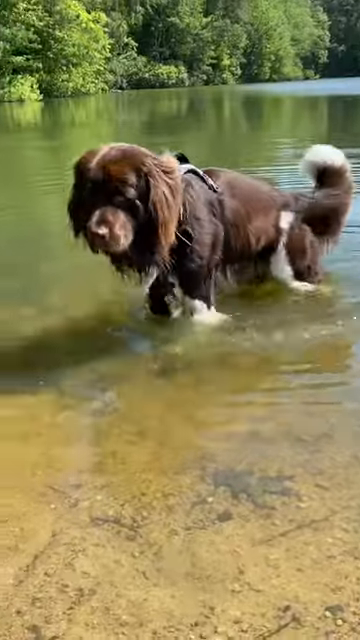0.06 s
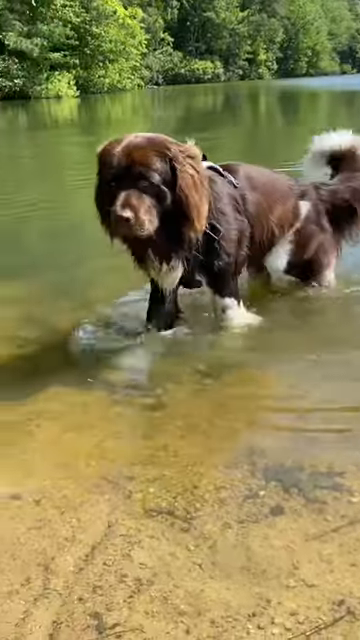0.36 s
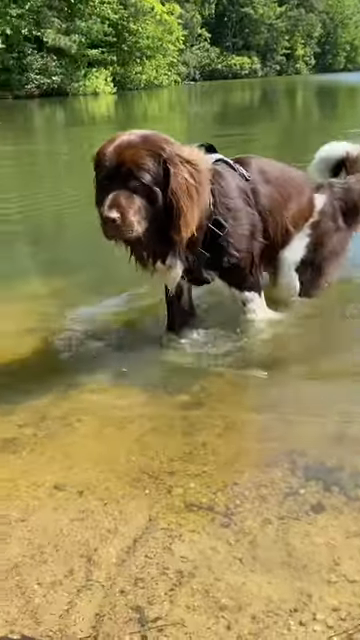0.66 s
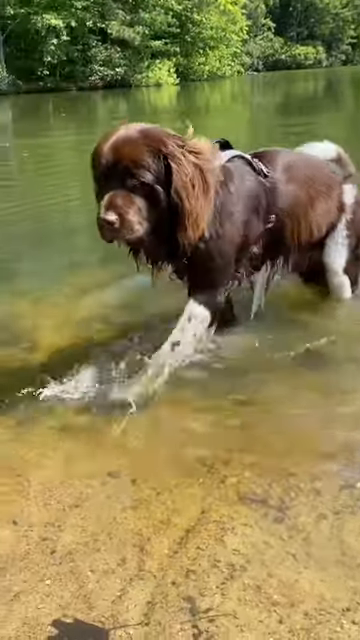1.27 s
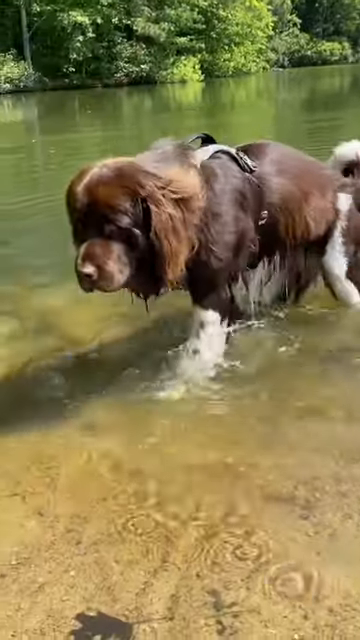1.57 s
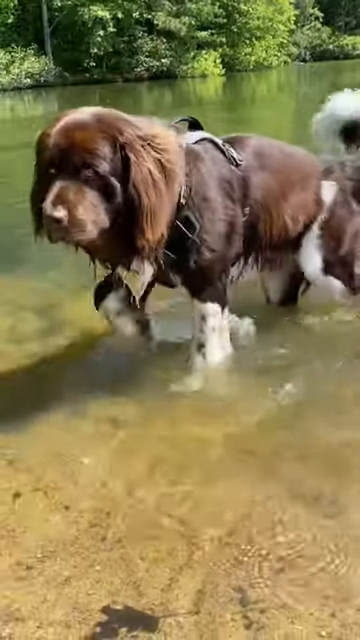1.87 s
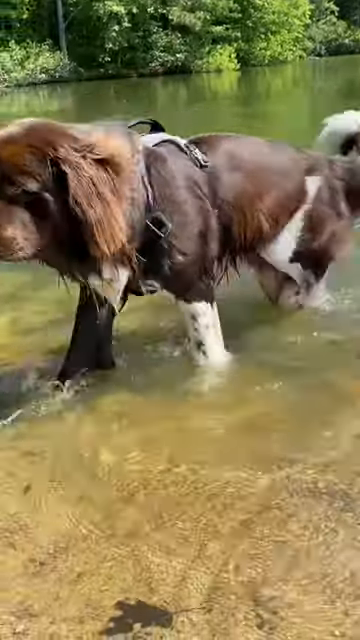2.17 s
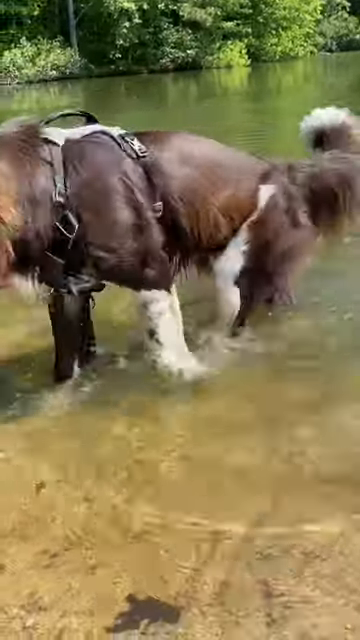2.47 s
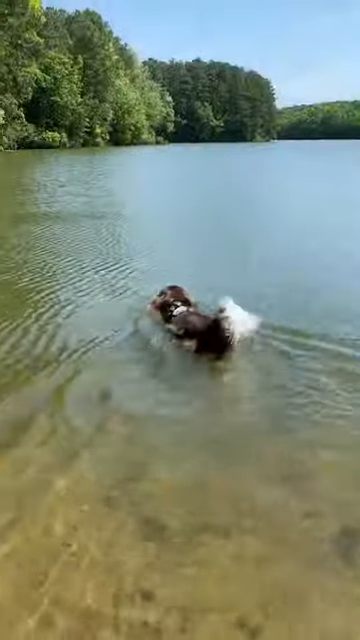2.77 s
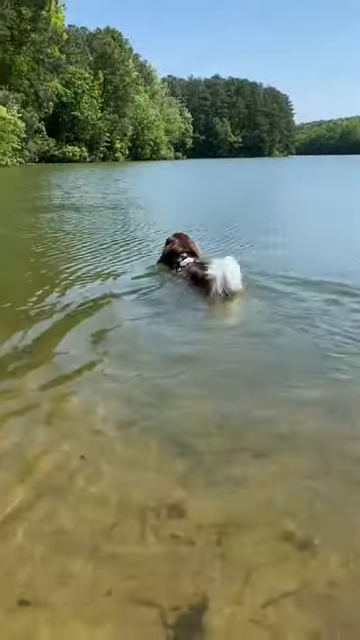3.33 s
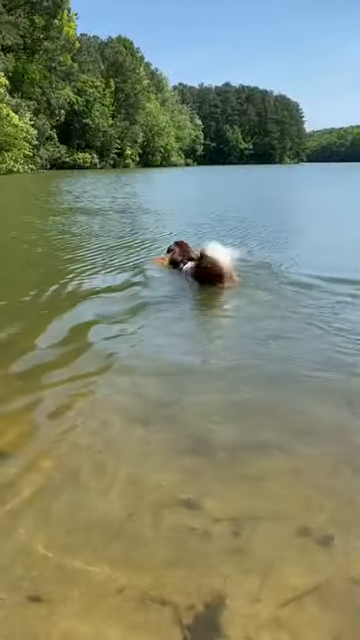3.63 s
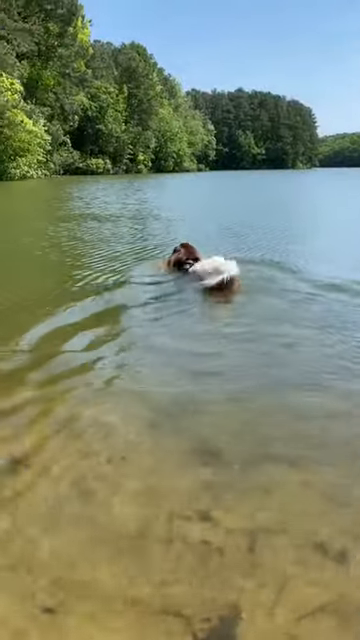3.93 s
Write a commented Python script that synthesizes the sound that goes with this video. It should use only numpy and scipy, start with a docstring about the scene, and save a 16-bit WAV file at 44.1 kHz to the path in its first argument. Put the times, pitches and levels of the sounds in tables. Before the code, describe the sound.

Close splashing and dripping come from a big dog wading at a lake's edge. The water then turns much quieter as it swims farther out, with small metallic clinks, a distant hum and soft wind bumps on the microphone.

```python
"""Lake shallows, on a microphone with two closely spaced ports. A large dog wades close by: each stride
churns up bubbles, which ring as dying sines, and throws spray, and its coat drips. From about 2.6 s
it is swimming far out: only light splashes, the clink of a metal clip and a low distant drone remain.
A faint wind rumbles throughout and buffets the ports, mostly near the end."""
import sys
import numpy as np
from scipy import signal
from scipy.fft import rfft, irfft
from scipy.io import wavfile

SR = 44100
rng = np.random.default_rng(int(sys.argv[2]) if len(sys.argv) > 2 else 0)


def persist_wave(psi):
    """Save psi, clipped to +-1, as 16-bit WAV."""
    counts = np.round(np.clip(psi, -1, 1) * 32767).astype(np.int16)
    wavfile.write(sys.argv[1], SR, np.atleast_2d(counts).T)


N = 176400
TIME, FREQS = np.arange(N) / SR, np.fft.rfftfreq(N, 1 / SR)
BAND_LIMIT_HZ = 15800


def amp(db):
    """Decibels to gain."""
    return 10 ** (np.asarray(db) / 20)


def unit(x):
    """Scales to rms 1."""
    return x / np.sqrt(np.mean(x ** 2) + 1e-20)


def across(points):
    """Reads a table over frequency on a log axis."""
    hz, value = np.transpose(points)
    return np.interp(np.log(FREQS + 1), np.log(hz + 1), value)


def level(points):
    """Gain over time from a table in dB; silent outside it."""
    times, db = np.transpose(points)
    return amp(np.interp(TIME, times, db)) * (TIME >= times[0]) * (TIME <= times[-1])


def colour(x, spectrum):
    """Gives a flat sound a spectrum, at rms 1."""
    return unit(irfft(rfft(x) * amp(across(spectrum)), N))


def drift(rate_hz):
    """Slow random wandering, rms 1."""
    return unit(irfft(rfft(rng.standard_normal(N)) * np.exp(-(FREQS / rate_hz) ** 2), N))


def add(mix, start, sound):
    """Mixes a sound in at a time in seconds."""
    part = mix[max(round(start * SR), 0):][:len(sound)]
    part += sound[:len(part)]


# Hiss from ahead, alike at both ports: f/Hz, spectral level/dB
HISS_SPECTRUM = [(300, 8.5), (1000, -7.5), (2200, -5), (4000, -8.5), (6300, -2.5), (9000, -6.5),
                 (12000, -5), (15500, -18)]
# Far water, different at each port: f/Hz, spectral level/dB
WASH_SPECTRUM = [(70, -24), (180, -4), (500, -2), (1000, 1), (2000, -14), (4000, -14), (7000, -58)]
def open_lake(hiss_db=-57, wash_db=-55.5, flicker_db=3):
    """Hiss and far water wash in from the open lake, flickering in level."""
    hiss = amp(hiss_db) * colour(rng.standard_normal(N), HISS_SPECTRUM)
    wash = amp(wash_db) * colour(rng.standard_normal((2, N)), WASH_SPECTRUM)
    return (hiss + wash) * amp(flicker_db * drift(32))


# Drone in the distance: t/s, level/dB
DRONE_LEVEL = [(2.56, -67), (2.59, -34.5), (2.71, -37.5), (2.76, -43), (3.03, -43), (3.25, -54),
               (3.56, -41), (3.8, -44), (4, -57)]
def distant_drone(hz=108.4, waver=0.024):
    """One low tone, far off, wavers in pitch."""
    pitch = hz * (1 + waver * drift(14.5))
    return np.sqrt(2) * np.sin(2 * np.pi * np.cumsum(pitch) / SR) * level(DRONE_LEVEL)


# Wind on the microphone: f/Hz, spectral level/dB
WIND_SPECTRUM = [(20, -22), (35, -14), (52, 0.5), (80, -1.5), (130, -9.5), (200, -13.5), (350, -22.5),
                 (700, -25.5), (2000, -45.5)]
# Rumble common to both ports: t/s, level/dB
RUMBLE_LEVEL = [(0, -38), (.7, -41.5), (1.5, -41.5), (2.4, -40.5), (3.0, -44.5), (3.7, -40), (4, -45.5)]
# Turbulence at each port alone: t/s, level/dB
TURBULENCE_LEVEL = [(0, -69), (2.7, -67), (2.88, -46), (3.1, -48), (3.3, -39), (3.5, -60)]
def wind(gust_db=2.5):
    """Faint gusts rumble at both ports and, near the end, hit each one separately."""
    rumble = colour(rng.standard_normal(N), WIND_SPECTRUM) * level(RUMBLE_LEVEL)
    turbulence = colour(rng.standard_normal((2, N)), WIND_SPECTRUM) * level(TURBULENCE_LEVEL)
    return (rumble + turbulence) * amp(gust_db * drift(20.5))


# Eddies right on the ports: t/s, length/s, first f/Hz, last f/Hz, peak level/dB
PORT_EDDIES = [(1.465, 0.013, 640, 152, -32), (1.93, 0.016, 107, 53.7, -29),
               (2.572, 0.038, 84, 79.6, -31.5), (3.168, 0.035, 106, 65, -24.5),
               (3.288, 0.0087, 756, 200, -34), (3.301, 0.017, 683, 145, -32.5),
               (3.354, 0.063, 171, 66, -23), (3.691, 0.03, 201, 58, -22), (3.722, 0.03, 330, 98, -29),
               (3.768, 0.048, 448, 145, -36), (3.899, 0.024, 334, 53, -32)]
def eddies(rough=0.11, tilt_db=1):
    """Puffs of wind roll over the ports and thump with a falling pitch, louder on the left."""
    out, flutter = np.zeros((2, N)), [drift(540), drift(380)]
    for start, length, first_hz, last_hz, db in PORT_EDDIES:
        progress = np.arange(0, length, 1 / SR) / length
        pitch = first_hz * (last_hz / first_hz) ** progress
        thump = np.sin(2 * np.pi * np.cumsum(pitch) / SR)
        envelope = amp(db) * np.sin(np.pi * progress ** 0.68)
        for port, noise in zip(out, flutter):
            add(port, start, envelope * (thump + rough * noise[round(start * SR):][:len(thump)]))
    return out * amp([[tilt_db], [-tilt_db]])


def shore_echo(x, wet_db=-11, decay_s=0.024):
    """Water and bank add a short faint echo to the direct sound, different at each port."""
    t = np.arange(6000) / SR
    tail = rng.standard_normal((2, len(t))) * np.exp(-t / decay_s)
    return x + amp(wet_db) * signal.fftconvolve(x, tail / np.linalg.norm(tail[0]), axes=1)[:, :N]


CLIP_HITS = [(2.807, -40), (2.821, -44), (2.859, -41), (3.005, -49), (3.043, -52)]
# Modes of its metal: f/Hz, level/dB, t60/s
METAL_MODES = [(3990, 0, 0.048), (4110, 0, 0.06), (5640, 7.5, .012), (9620, 5, 0.061), (10610, 5, 0.049),
               (11670, 6, 0.074)]
def metal_clip(tick_gain=0.52, tick_s=0.0043):
    """A small metal clip ticks and rings in its modes at each hit."""
    out, t = np.zeros(N), np.arange(4096) / SR
    for start, db in CLIP_HITS:
        ring = sum(amp(mode_db - 60 * t / t60) * np.sin(2 * np.pi * (hz * t + rng.random()))
                   for hz, mode_db, t60 in METAL_MODES)
        tick = tick_gain * rng.standard_normal(len(t)) * np.exp(-t / tick_s)
        add(out, start, amp(db) * (ring / 2 + tick))
    return out


# Slaps on the surface, close by and then far out: t/s, level/dB, decay/s, centre f/Hz
SURFACE_SLAPS = [(0.172, -25, 0.0025, 1680), (.189, -36, .003, 2500), (.201, -34, .004, 2700),
                 (0.211, -37, .002, 9000), (.289, -26, .0035, 7950), (0.609, -35, 0.0024, 4300),
                 (.878, -36, .0039, 6000), (1.141, -16.5, 0.0038, 4200), (1.15, -22, 0.0046, 3180),
                 (1.155, -21, 0.0039, 2600), (1.473, -25.5, .0016, 3670), (2.044, -20, 0.0022, 2350),
                 (2.092, -32, .002, 2000), (2.115, -23.5, 0.0054, 3700), (2.297, -32.5, 0.02, 4300),
                 (2.474, -30.5, 0.0045, 5000), (3.312, -40, 0.0054, 2940), (3.514, -38, 0.0023, 6000),
                 (3.526, -37, 0.0049, 6160), (3.635, -33, 0.0052, 4440), (3.719, -33.5, 0.002, 2300),
                 (3.748, -38, 0.0027, 7000)]
def slaps(edge_ratio=3.5, attack_s=0.0004):
    """Falling water hits the surface in a short broad crack."""
    out, t = np.zeros(N), np.arange(2048) / SR
    for start, db, decay_s, hz in SURFACE_SLAPS:
        band = signal.butter(2, [hz / edge_ratio, min(hz * edge_ratio, BAND_LIMIT_HZ)], "band", fs=SR)
        crack = unit(signal.lfilter(*band, rng.standard_normal(len(t))))
        envelope = np.exp(-t / decay_s) * (1 - np.exp(-t / attack_s))
        add(out, start, amp(db) * crack * envelope)
    return out


def bubble(hz, decay_s, rise, onset_cycles):
    """A dying sine; with positive rise its pitch climbs as the bubble nears the surface."""
    t = np.arange(0, 6 * decay_s, 1 / SR)
    pitch = np.minimum(hz * (1 + rise * t / decay_s), SR / 2)
    envelope = np.exp(-t / decay_s) * (1 - np.exp(-t * hz / onset_cycles))
    return np.sin(2 * np.pi * np.cumsum(pitch) / SR) * envelope


def swarm(per_s, low_hz, high_hz, cycles, rise, spread_db, sizes=64):
    """Bubbles of many sizes form at random moments; flat spectrum, rms 1."""
    out = np.zeros(N)
    for hz, (ring, glide) in zip(np.geomspace(low_hz, high_hz, sizes), rng.random((sizes, 2))):
        decay_s = cycles * 2 ** (2 * ring - 1) / hz
        grain = bubble(hz, decay_s, rise * (2 * glide - 0.4), onset_cycles=1.2)
        grain *= np.sqrt(hz) / np.linalg.norm(grain)  # equal energy per Hz
        births = np.flatnonzero(rng.random(N) < per_s / sizes / SR)
        draw = rng.uniform(-1, 1, N)[births]
        strength_db = spread_db * np.minimum(-np.log(abs(draw)), 3.5)
        train = np.zeros(N)
        train[births] = np.sign(draw) * amp(strength_db)
        out += signal.oaconvolve(train, grain)[:N]
    return unit(out)


# Single bubbles, nearly all close by: t/s, f/Hz, level/dB, decay/s, relative rise per decay time
LARGE_BUBBLES = [(.168, 1284, -28.5, 0.011, 0.022), (.174, 646, -23, 0.0039, 0.14),
                 (.205, 878, -33, 0.016, 0.036), (0.247, 2440, -32.5, 0.0033, 0.39),
                 (.257, 4080, -22.5, 0.0013, 0.28), (0.263, 200, -31.5, .018, 0.008),
                 (.267, 726, -28, 0.0082, -0.046), (.282, 585, -23, 0.0068, .013),
                 (.311, 467, -22.5, 0.0047, 0.061), (0.356, 413, -28, 0.0095, 0.26),
                 (.382, 807, -33, 0.01, .2), (0.552, 2710, -21.5, 0.00058, 0.022),
                 (0.583, 2310, -39.5, 0.0064, 0.13), (0.609, 2180, -24.5, 0.0023, 0.048),
                 (0.69, 1680, -33.5, 0.0045, 0.18), (0.712, 1650, -31.5, 0.0056, 0.035),
                 (0.893, 980, -25.5, 0.0035, 0.086), (0.996, 1250, -33, 0.0083, 0.11),
                 (1.03, 1850, -32.5, 0.0059, 0.14), (1.091, 3100, -27.5, 0.0038, -.05),
                 (1.351, 3130, -24.5, 0.0018, 0.085), (1.494, 1960, -37.5, .005, -.048),
                 (1.611, 1227, -34, 0.0094, -0.089), (1.669, 670, -34.5, 0.0064, -0.099),
                 (1.77, 2520, -26.5, 0.0029, .02), (1.824, 1870, -31.5, 0.0037, 0.094),
                 (1.94, 3040, -31.5, 0.0072, 0.00097), (2.091, 1080, -29.5, 0.0076, -0.042),
                 (2.117, 628, -32.5, 0.021, 0.2), (2.139, 817, -26.5, 0.0048, 0.21),
                 (2.163, 493, -38, 0.018, 0.026), (2.257, 990, -25.5, 0.003, 0.01),
                 (2.262, 667, -33.5, 0.0096, 0.22), (2.295, 1108, -28, 0.013, 0.017),
                 (2.402, 420, -31.5, 0.011, -.05), (2.528, 1924, -23.5, .003, 0.062),
                 (2.538, 1570, -36.5, 0.011, -0.14), (3.638, 1820, -22.5, 0.0024, 0.0071)]
def plops():
    """Large bubbles ring out singly."""
    out = np.zeros(N)
    for start, hz, db, decay_s, rise in LARGE_BUBBLES:
        add(out, start, amp(db) * bubble(hz, decay_s, rise, onset_cycles=1.12))
    return out


# Drips and ripples between strides, faint once the dog is far out: t/s, level/dB
TRICKLE_LEVEL = [(0, -60), (.45, -55.5), (.8, -54.5), (.9, -45.5), (1.45, -45.5), (1.8, -44), (2.5, -46),
                 (2.62, -61), (3.15, -64), (4, -87)]
# Drips on the lake: f/Hz, spectral level/dB
DRIP_SPECTRUM = [(900, 4), (1800, 2), (3500, -6), (7500, -7), (10500, -4.5), (15500, 1)]
def dripping_coat(patter=0.68, spurt_db=3):
    """Water trickles off the coat in uneven spurts of ringing drips and short ticks."""
    drips = swarm(per_s=320, low_hz=987, high_hz=12270, cycles=8.4, rise=0.055, spread_db=3)
    ticks = swarm(per_s=650, low_hz=2770, high_hz=10400, cycles=2.8, rise=0.028, spread_db=-1.5, sizes=16)
    spurts = (drips + patter * ticks) * amp(spurt_db * drift(19))
    return level(TRICKLE_LEVEL) * colour(spurts, DRIP_SPECTRUM)


def surge(start, swell_s, decay_s, settle=1.5):
    """A splash swells to full strength; with settle above 1 the water calms ever faster."""
    t = TIME - start
    return np.clip(t / swell_s, 0, 1) * np.exp(-(np.maximum(t - swell_s, 0) / decay_s) ** settle)


# Paw strokes, close by but for the last: t/s, swell/s, decay/s, spray level/dB, churn level/dB
PAW_STROKES = [(0.156, 0.0097, 0.076, -40, -35), (0.25, 0.014, 0.14, -43, -40.5),
               (0.828, 0.017, 0.073, -57.5, -48.5), (.96, .13, 0.035, -45.5, -49),
               (1.129, 0.011, 0.057, -39, -52.5), (1.165, 0.0079, 0.01, -34.5, -48),
               (1.279, 0.03, 0.06, -40, -48), (1.42, 0.073, 0.25, -58, -50),
               (1.892, 0.05, 0.089, -36.5, -49.5), (2.113, 0.0039, 0.071, -41.5, -64),
               (2.256, 0.005, 0.11, -54, -53), (2.378, 0.021, 0.041, -39.5, -42.5),
               (2.453, 0.016, 0.058, -38.5, -52), (3.749, 0.026, 0.024, -50.5, -51.5)]
# Thrown spray: f/Hz, spectral level/dB
SPRAY_SPECTRUM = [(500, 9), (1200, -4), (2200, 2), (3500, -1), (5500, 0), (7500, 0.5), (9000, 2.5),
                  (10500, -0.5), (12500, 0.5), (15500, -13)]
# Churned water: f/Hz, spectral level/dB
CHURN_SPECTRUM = [(100, -29), (200, 3.5), (350, -3), (600, 5), (1200, -3.5), (1800, -2.5), (2800, -7.5),
                  (6000, -18)]
def wading(fizz=0.12, froth=0.05, spray_boost_db=2.5, churn_boost_db=4):
    """Paws plunge, push and lift: each stroke throws fine spray and churns up larger bubbles."""
    drops = swarm(per_s=2100, low_hz=1137, high_hz=13040, cycles=5.3, rise=0.041, spread_db=-0.5)
    spray = colour(drops + fizz * rng.standard_normal((2, N)), SPRAY_SPECTRUM)
    gurgle = swarm(per_s=420, low_hz=201.7, high_hz=2792, cycles=6.46, rise=0.1346, spread_db=0)
    churn = colour(gurgle + froth * rng.standard_normal((2, N)), CHURN_SPECTRUM)
    out = np.zeros((2, N))
    for start, swell_s, decay_s, spray_db, churn_db in PAW_STROKES:
        splash = amp(spray_db + spray_boost_db) * spray + amp(churn_db + churn_boost_db) * churn
        out += surge(start, swell_s, decay_s) * splash
    return out


def scene():
    """The dog and its echo off the shore, over wind, lake and drone."""
    dog = wading() + dripping_coat() + plops() + slaps() + metal_clip()
    return shore_echo(dog) + wind() + open_lake() + distant_drone() + eddies()


# Microphone response: f/Hz, level/dB
MIC_RESPONSE = [(8500, 0), (11000, -10), (13500, -13), (15800, -19)]
# Balance of the ports: f/Hz, left minus right level/dB
LEFT_EXCESS = [(170, 0), (400, -2), (750, -3.5), (950, -7), (1100, -4), (1350, -6), (2000, 0)]
# Phase between the ports: f/Hz, lead of the left/rad
LEFT_LEAD = [(180, 0), (600, -.8), (900, -1.6), (1150, -.8), (1650, -.4), (2000, 0), (5200, .2),
             (7300, 3.1), (10000, 6.2), (11200, 6.4), (12600, 9.4), (14400, 9.5), (15500, 12.4)]
def record(dry):
    """The microphone's two ports differ in phase and level; the treble is dulled and band-limited."""
    left = amp(across(LEFT_EXCESS) / 2) * np.exp(0.5j * across(LEFT_LEAD))
    ports = irfft(rfft(dry) * amp(across(MIC_RESPONSE)) * np.array([left, 1 / left]), N)
    lowpass = signal.firwin(511, BAND_LIMIT_HZ, window=("kaiser", 9), fs=SR)
    return signal.oaconvolve(ports, lowpass[None], "same")


dry = scene()
out = record(dry)
persist_wave(out)
```